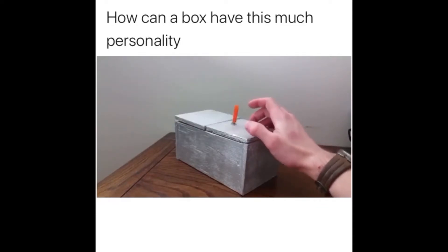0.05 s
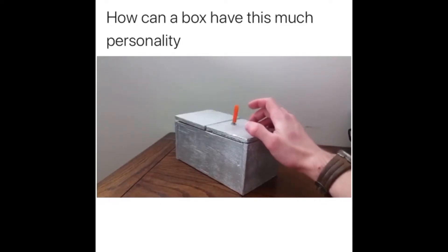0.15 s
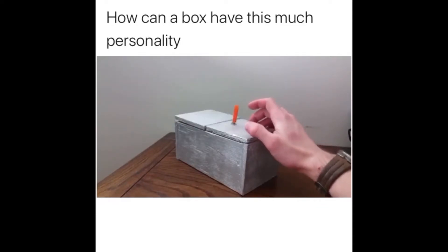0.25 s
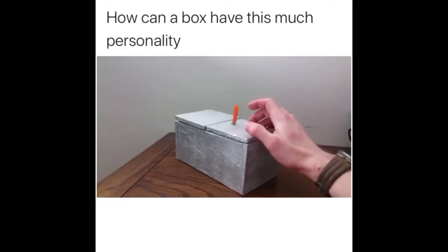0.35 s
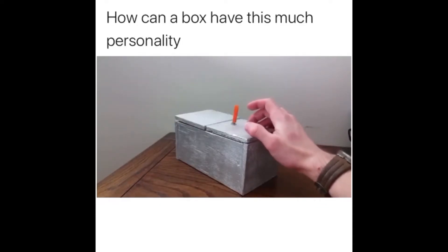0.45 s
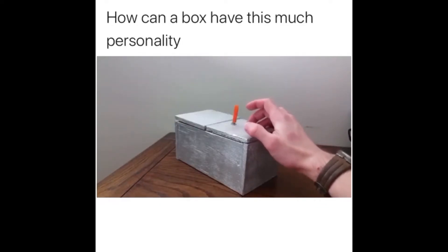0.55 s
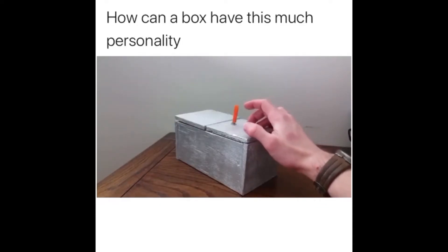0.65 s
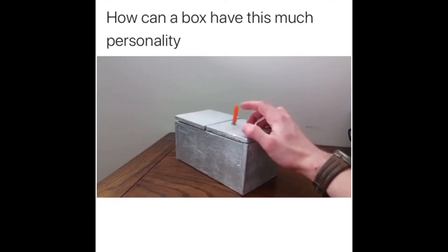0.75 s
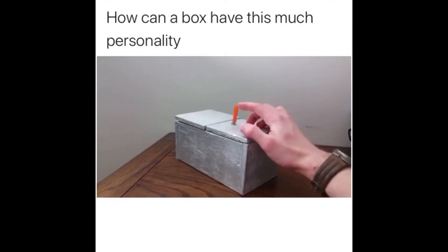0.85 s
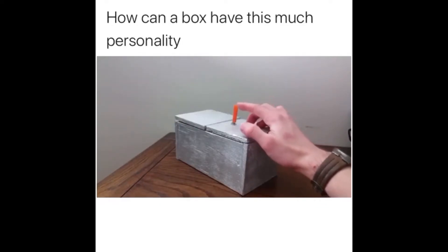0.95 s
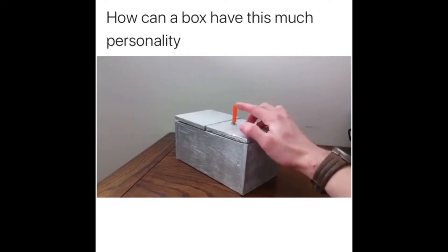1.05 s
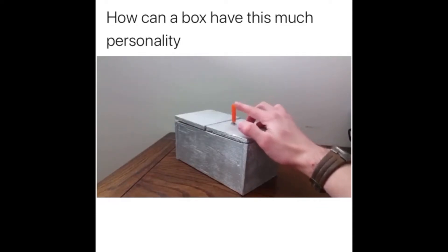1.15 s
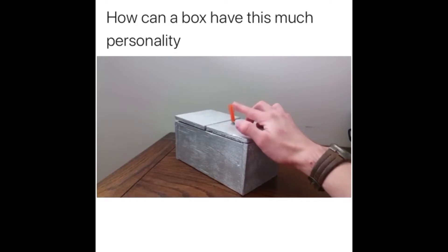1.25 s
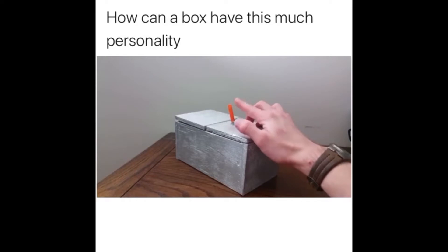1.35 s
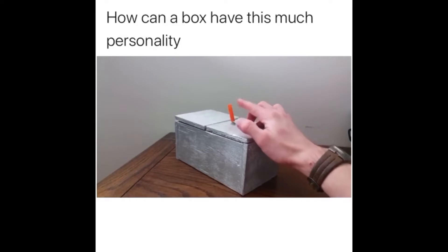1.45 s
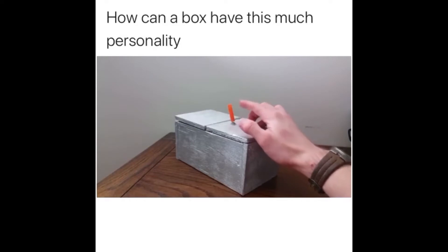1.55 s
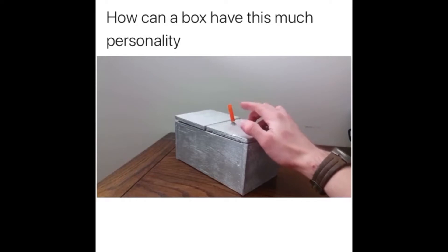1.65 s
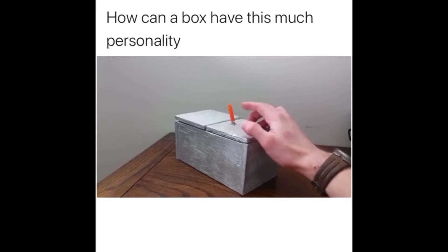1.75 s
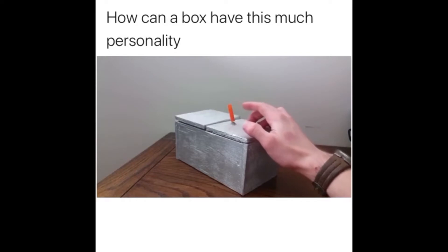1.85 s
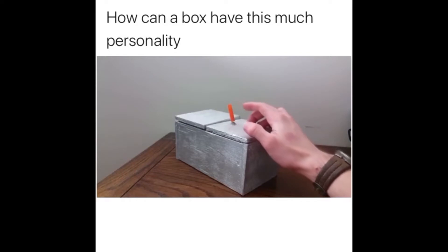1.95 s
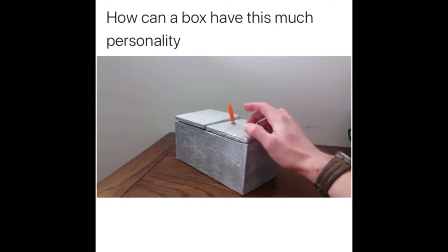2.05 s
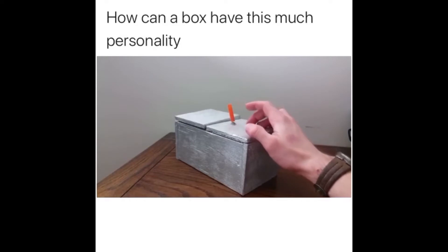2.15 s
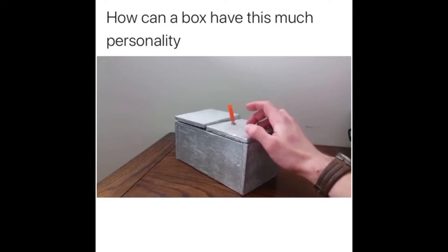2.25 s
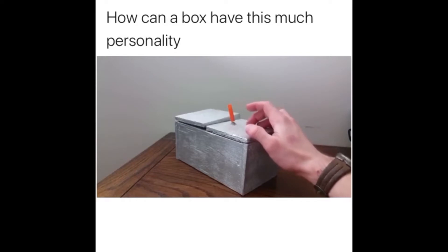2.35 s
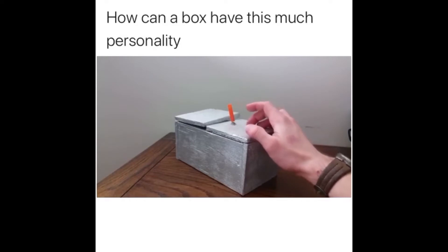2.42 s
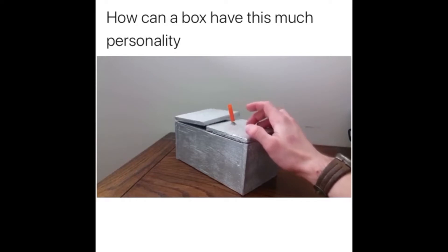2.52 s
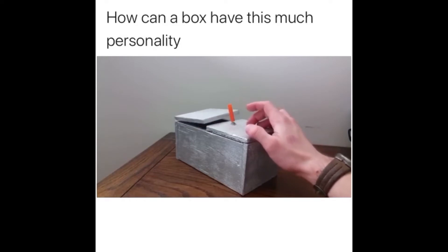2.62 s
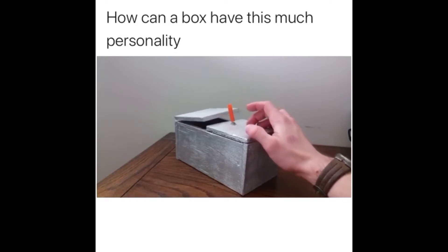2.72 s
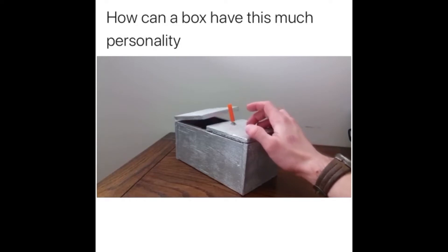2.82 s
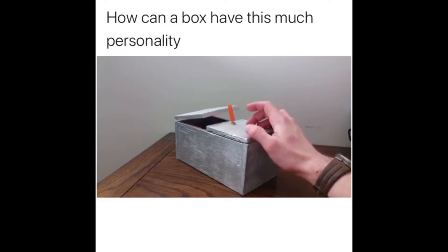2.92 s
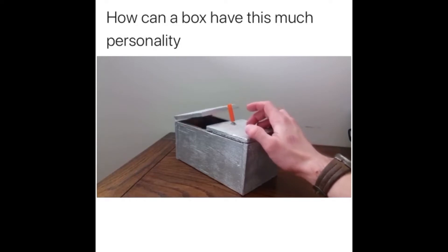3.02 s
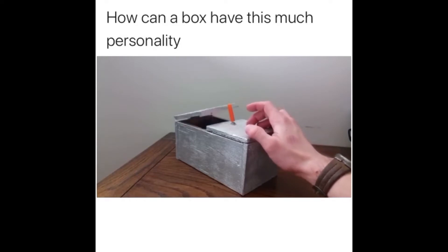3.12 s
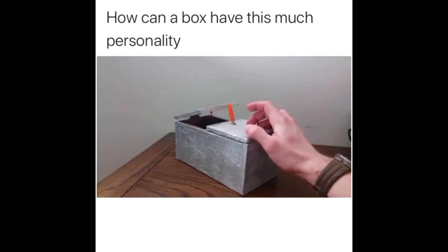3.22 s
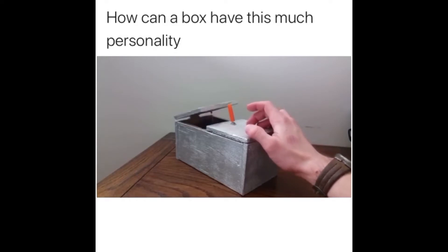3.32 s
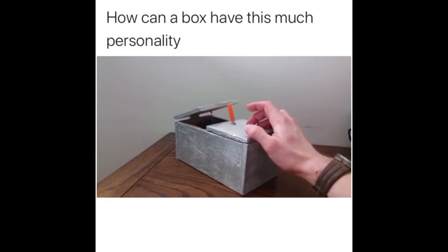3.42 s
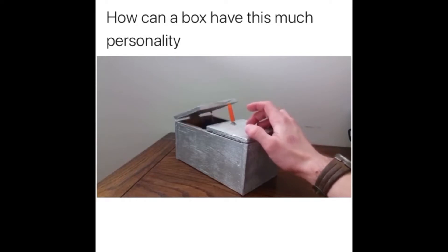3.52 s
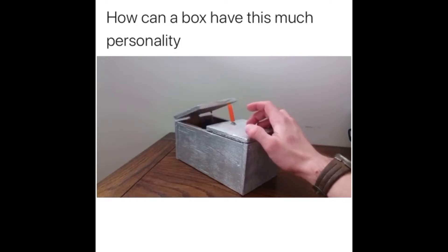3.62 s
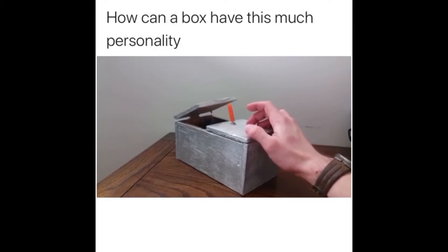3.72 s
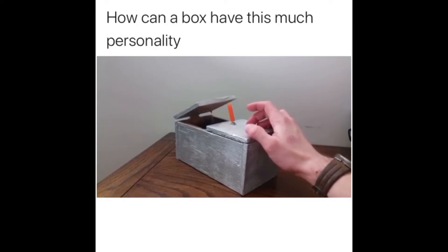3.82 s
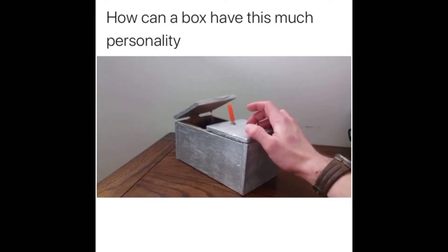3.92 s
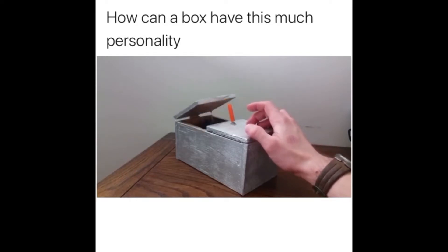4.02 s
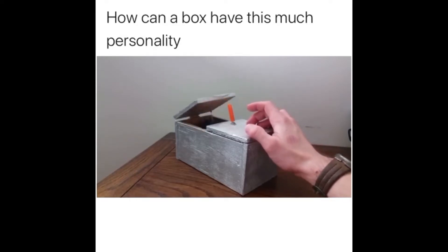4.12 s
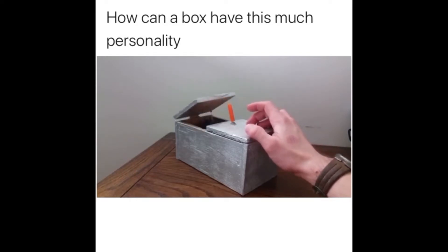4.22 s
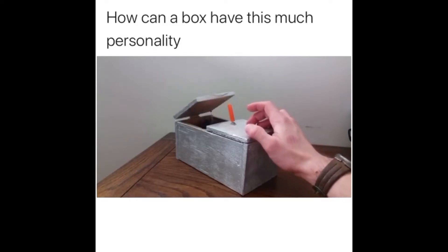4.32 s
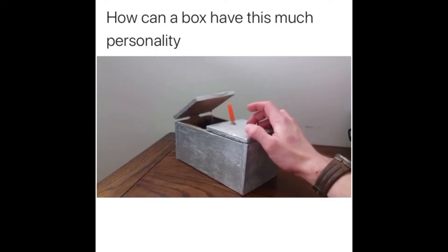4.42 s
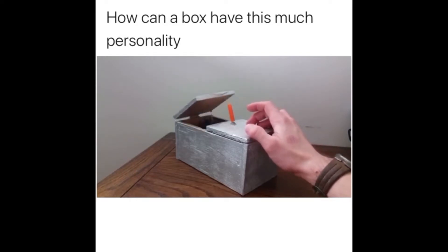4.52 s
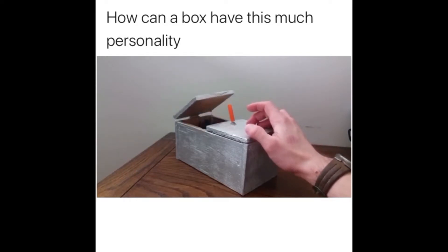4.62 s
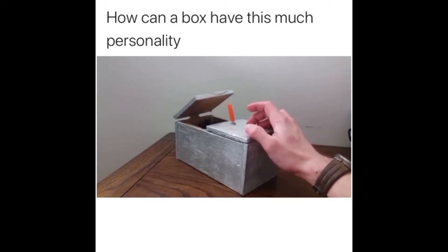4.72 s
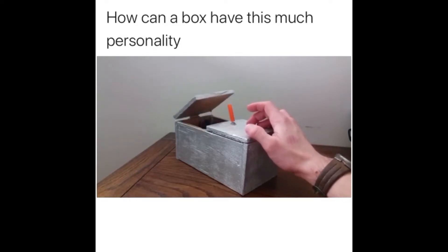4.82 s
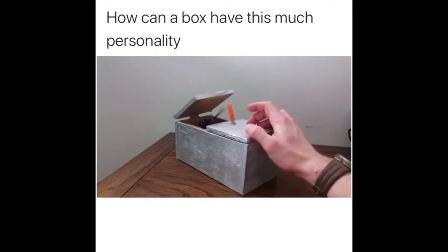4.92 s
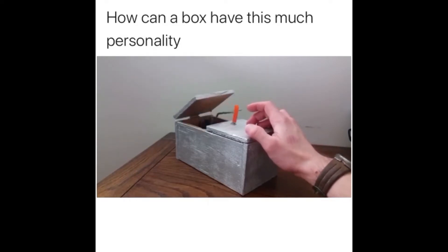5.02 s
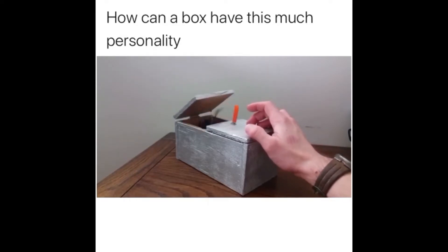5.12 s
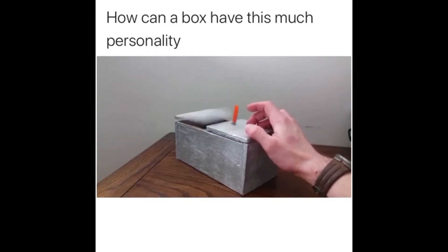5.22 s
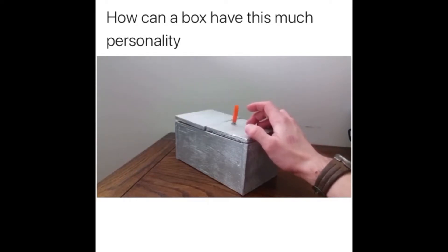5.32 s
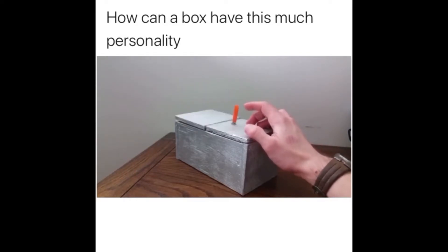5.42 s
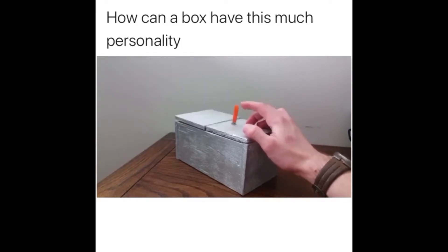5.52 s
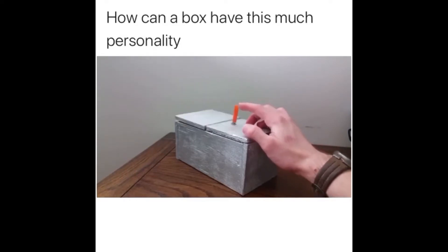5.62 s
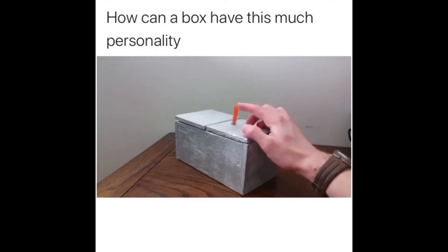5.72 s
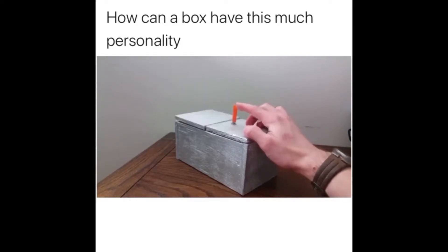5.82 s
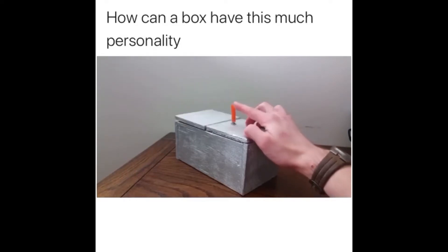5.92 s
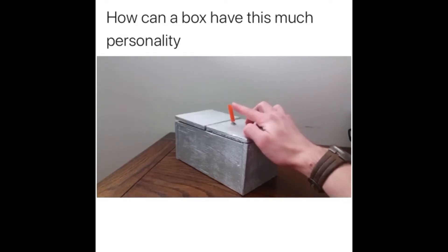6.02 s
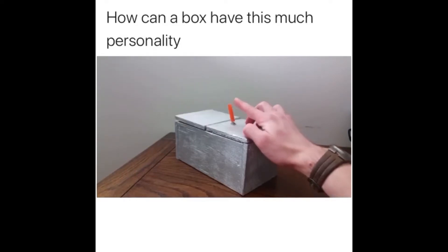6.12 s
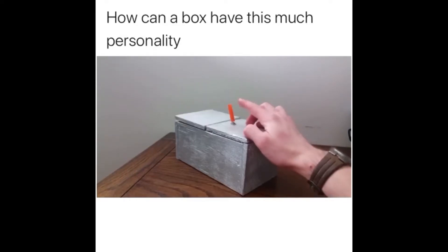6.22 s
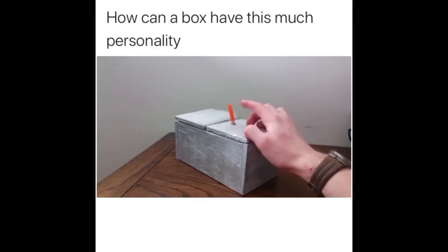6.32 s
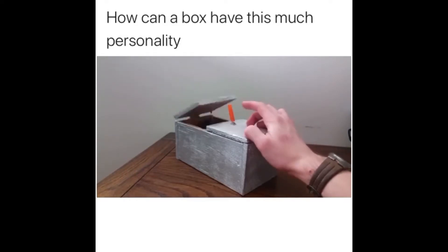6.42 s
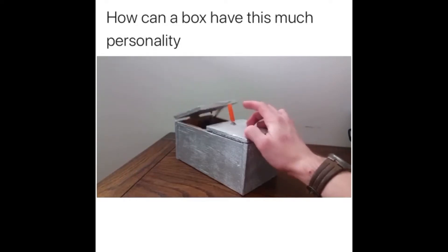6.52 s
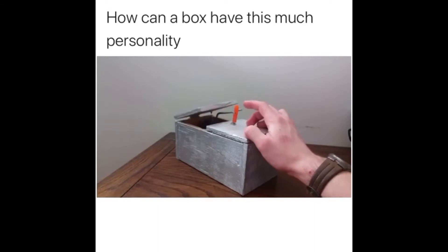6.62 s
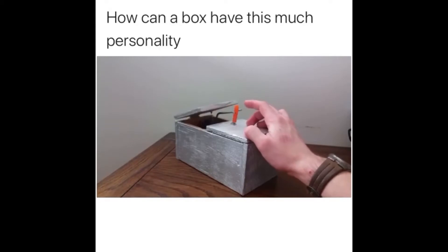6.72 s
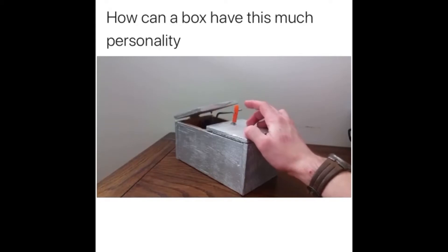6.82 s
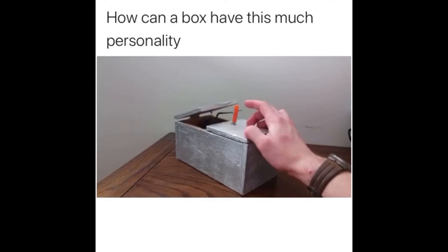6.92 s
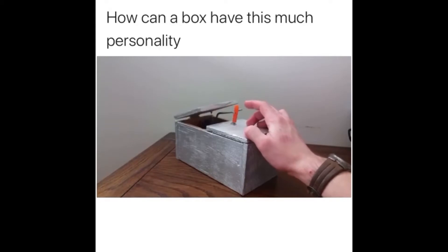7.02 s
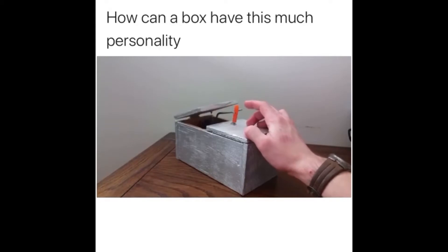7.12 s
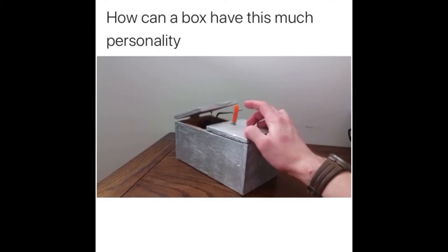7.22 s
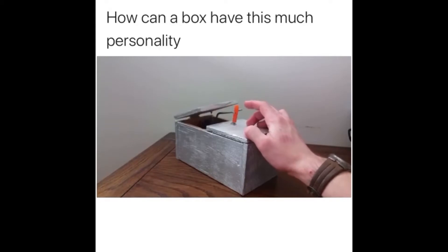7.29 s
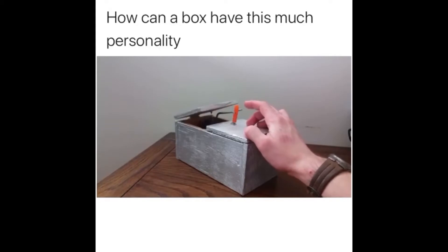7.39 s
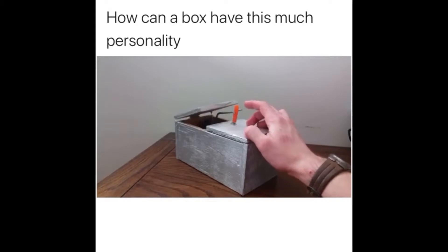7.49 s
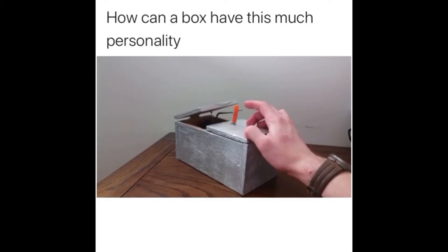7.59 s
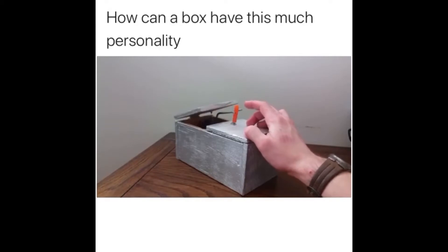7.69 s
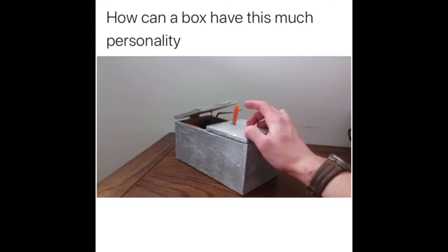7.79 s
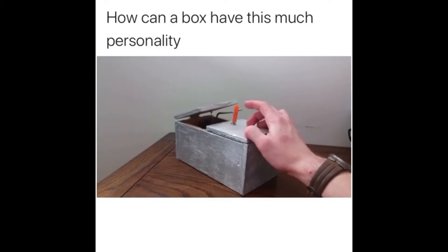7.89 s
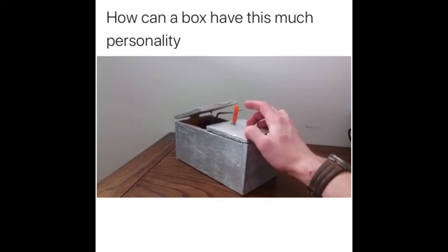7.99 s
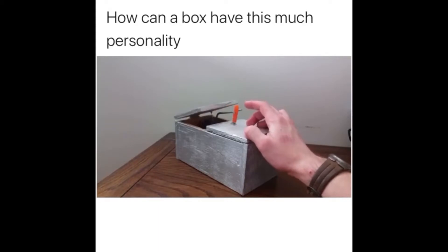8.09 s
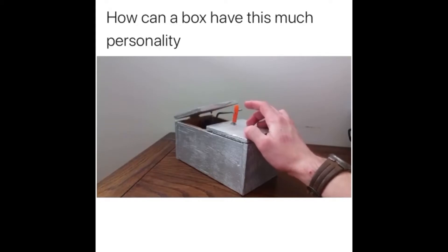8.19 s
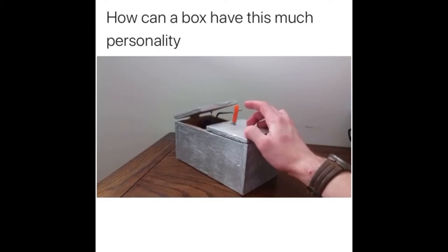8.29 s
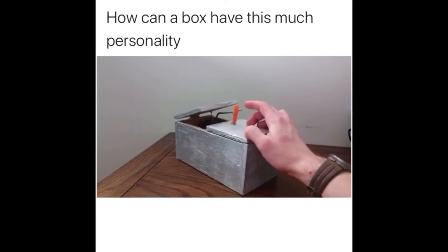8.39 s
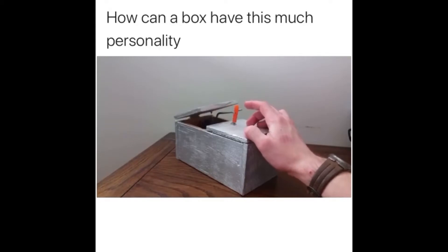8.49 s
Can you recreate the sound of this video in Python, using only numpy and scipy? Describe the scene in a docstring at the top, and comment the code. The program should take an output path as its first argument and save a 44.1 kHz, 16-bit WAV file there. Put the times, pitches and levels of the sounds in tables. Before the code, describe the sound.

A servo whirr and a hollow wooden lid slap, then a toggle click, a long twitchy servo creep, sudden whirring, loud knocks, and another quicker round.

```python
"""Toggle box in a quiet room

A small wooden box near one microphone: a finger clicks its toggle; servo motors lift the lid and flick it back.
Creeping or holding, a servo twitches on its 50-a-second control pulse, as shaped noise; at full speed
its gears whirr as denser noise, with short tones. Toggle, arm and lid knock on the hollow box as decaying
modes, and a short room tail and faint room hiss and hum lie behind."""
import sys
import numpy as np
from scipy import signal
from scipy.fft import rfft, irfft, next_fast_len
from scipy.io import wavfile
from scipy.ndimage import uniform_filter1d

SR = 44100
rng = np.random.default_rng(int(sys.argv[2]) if len(sys.argv) > 2 else 0)


def generate_wav(sig):
    """Save sig (samples, or channels by samples) to the path in sys.argv[1] as 16-bit PCM at SR."""
    pcm = np.round(np.clip(np.atleast_2d(sig).T, -1, 1) * 32767).astype(np.int16)
    wavfile.write(sys.argv[1], SR, pcm)


N = 377055
T = np.arange(N) / SR

# The lid creeps up. Each row: time in seconds, twitch level, box hum level in dB,
# treble above the 6860 Hz split in dB relative to the twitch.
CREEP = [(1.35, -57.5, -67, -8), (1.49, -45.5, -58, -0.5), (1.6, -52, -80, -9), (1.66, -60.5, -89, -24),
         (1.7, -49, -78, 1), (1.82, -52.5, -69, -16), (2.04, -49, -72.5, -10.5), (2.2, -43.5, -58.5, -3),
         (2.3, -44.5, -57.5, -9.5), (2.47, -41, -59.5, -5.5), (2.57, -43.5, -58.5, -9),
         (2.79, -42, -60.5, -4.5), (3.3, -43, -58, -6.5), (3.9, -43, -58.5, -10.5), (4.0, -46, -76, -6),
         (4.06, -43.5, -60.5, -9), (4.5, -43.5, -64, -6), (4.62, -42.5, -59.5, -6.5),
         (4.86, -42.5, -58.5, -11)]
# Single twitches that stand out, some strong, some faint and bright.
# Each row: start in seconds, level in dB, treble in dB relative to it.
JERKS = [(1.7482, -57, 6), (1.788, -52, -5), (1.8484, -46.5, -5), (1.889, -55, -6), (1.9472, -52, -24),
         (2.068, -44, -17), (2.09, -38, -1), (2.19, -57, 2), (2.228, -57, 8), (2.449, -40.5, 5),
         (2.549, -58, 13), (2.6483, -47, 6), (2.69, -43, 4.5), (2.7073, -42, 0), (2.748, -46.5, 2),
         (2.7893, -50, 8), (2.8074, -45, -4), (2.888, -44, -3), (2.946, -44.5, 4), (2.9832, -37, -2.5),
         (3.0097, -42, -1), (3.048, -42, -10), (3.086, -46, -2), (3.205, -37.5, -2), (3.2473, -42, 7),
         (3.2844, -37, 0), (3.3066, -45, 5), (3.449, -41, -16), (3.547, -40, 3.5), (3.607, -49, -7),
         (3.6264, -43, -4), (3.749, -41, -12), (3.7645, -40.5, -2), (3.786, -50, -15), (3.806, -36, -1),
         (3.8473, -36, 4), (3.949, -48, 2), (4.044, -41.5, 0), (4.106, -48.5, 7), (4.1454, -43.5, 7),
         (4.165, -46, 6), (4.3068, -45, 0), (4.343, -40, -1), (4.364, -39, -3), (4.465, -57, 11),
         (4.5448, -42, 4), (4.6254, -47, 3), (4.647, -37.5, 2)]
# Colour of the twitch noise. Each row: frequency in Hz, relative density in dB.
TWITCH = [(200, -5.5), (400, -6.5), (1000, -14.5), (2300, -16), (3000, -12.5), (3600, -9), (4800, -3.5),
          (6500, -12), (7400, -4.5), (8900, -10), (9300, -13.5), (10400, -27), (11500, -16.5), (12600, -12)]
# Humps that the case adds to it. Each row: centre in Hz, width in Hz, gain in dB.
CASE = [(2085, 72, 8), (2984, 330, 8), (4824, 210, 7), (6010, 530, 10), (7360, 1100, 5), (8610, 380, 10.5)]
# Lowest box resonances, passed twice. Each row: centre in Hz, width in Hz, gain per pass in dB.
HUM = [(65.7, 36, 0), (110.4, 32, 0.5), (145.2, 17, -0.5)]
# The servo settles under the open lid. Each row: time in seconds, twitch level in dB, strained lid level in dB.
HOLD = [(6.75, -55, -82), (6.94, -50, -86), (7.3, -53, -80), (7.47, -57, -77), (8.55, -58.5, -76)]
# Colour of the holding servo. Each row: frequency in Hz, relative density in dB.
BUZZ = [(180, 1), (300, -1), (773, -4.5), (891, -5.5), (1030, -5), (1160, -5.5), (1320, -10), (2220, -13.5),
        (3100, -4), (5820, 6), (6600, -12), (7730, -2), (8900, -13), (9480, -34.5), (13000, -24)]
# The lid under load, passed twice. Each row: centre in Hz, width in Hz, gain per pass in dB.
STRAIN = [(425, 130, -3), (596, 110, 0.5), (897, 81, -0.5), (1020, 50, -7), (1156, 66, 4)]
# One list a fast stroke. Each row: time in seconds, gear level in dB, shaken box level in dB.
STROKES = [
    [(0.0, -27, -32.5), (0.018, -18.5, -40), (0.066, -26.5, -25), (0.13, -31.5, -38), (0.2, -38, -51)],
    [(4.84, -38, -64), (4.858, -28, -49.5), (4.87, -31, -46), (5.026, -31, -44.5), (5.048, -18.5, -33),
     (5.064, -25, -44.5), (5.08, -19, -34), (5.092, -30.5, -41), (5.3, -25, -36.5), (5.312, -21.5, -31),
     (5.335, -23, -20.5), (5.376, -21.5, -31), (5.45, -58, -47)],
    [(6.35, -59, -60), (6.402, -23, -48), (6.44, -24, -50), (6.532, -36, -43.5), (6.578, -25, -40),
     (6.616, -33.5, -39), (6.66, -23.5, -42.5), (6.672, -19, -44), (6.69, -19, -35), (6.702, -22.5, -26),
     (6.712, -53, -27), (6.8, -63, -61)],
]
# Colour of the gears. Each row: frequency in Hz, relative density in dB.
GEARS = [(900, -22.5), (1500, -31.5), (2000, -29), (2600, -16), (3200, -6), (4100, -11), (5500, -5.5),
         (6500, -4), (7500, -0.5), (8700, -5), (9300, -10), (10400, -12.5), (11500, -5), (12500, -2.5)]
# Short tones during the fast strokes.
# Each row: start in seconds, length in seconds, mean pitch in Hz, start level and end level in dB.
TONES = [(4.899, 0.15, 441, -39, -34), (5.2, 0.1, 462, -44.5, -37.5), (6.391, 0.094, 127, -32, -46),
         (6.424, 0.069, 2005, -42, -58), (6.511, .15, 428, -45.5, -35.5)]
# The arm slips on the toggle. Each row: start in seconds, length in seconds, start and end pitch in Hz, level in dB.
SQUEAKS = [(5.042, .018, 4300, 2900, -21), (6.665, .014, 4500, 3200, -19)]
# Levels of a squeak's harmonics from the fundamental up, in dB.
OVERTONES_DB = [-6.5, -1.5, -7.5]
# The toggle snaps over. Each row: start in seconds, level in dB.
CLICKS = [(1.3400, -25.5), (6.0981, -24.5)]
# Ringing parts of the toggle. Each row: frequency in Hz, level in dB, 60 dB decay time in seconds.
TOGGLE = [(3104, -9, 0.037), (3315, -5.5, 0.026), (4340, 1.5, .02), (4570, -1, 0.017), (5200, -16.5, 0.017),
          (11360, -3, .01)]
# Blows on the box. Each row: start in seconds, blow level in dB, crack level in dB relative to the blow,
# extra level of the low modes and of the high modes in dB.
KNOCKS = [(0.0591, 1.5, -6, -1.5, 1.5), (0.067, -20.5, -11, -4.5, -24), (.087, -15, -31.5, -1, 1.5),
          (0.103, -15, -19.5, -13.5, -17.5), (1.34, -14.5, -9, 1.5, 1.5), (1.368, -24, -31.5, -1, -7),
          (5.032, -19.5, -18.5, 1, 12.5), (5.0772, -5, -8, -1, 11.5), (5.3264, 1, -6, -1, -1),
          (5.341, -13.5, -27, -6.5, -5.5), (5.356, -2.5, -15.5, -6.5, -13.5), (5.37, -2.5, -19, -15.5, -3),
          (6.1002, -14.5, -9, -1, -3.5), (6.127, -22, -31, 5, -4.5), (6.572, -15.5, -5.5, 3.5, 11.5),
          (6.657, -27, -23, 18, 17), (6.6998, -9.5, -4.5, 5, 10.5), (6.73, -11, -26, -15, -25)]
# Modes of the hollow box. Each row: frequency in Hz, relative level in dB, 60 dB decay time in seconds.
BOX = [(68.6, -11, 0.067), (124, -6.5, 0.063), (159, -0.5, 0.04), (231, -2, 0.044), (313.6, -5, 0.11),
       (319.4, -6, 0.13), (369, -3.5, 0.044), (453, 0.5, 0.03), (503, 0.5, 0.033), (549, -4, 0.046),
       (640, -13, 0.1), (793, -9.5, 0.027), (932.5, -10, 0.037), (1152, -13.5, 0.0097), (1416, -18, 0.02),
       (2095, -22.5, 0.015)]
# Colour of the crack. Each row: frequency in Hz, relative density in dB.
CRACK = [(900, -0.5), (2200, -12.5), (3100, -4.5), (4400, -3.5), (6000, -9), (7500, -18), (10200, -22.5),
         (12500, -14)]
# Room decay. Each row: frequency in Hz, 60 dB decay time in seconds.
ROOM = [(100, 0.5), (400, 0.35), (1500, 0.5), (5000, 0.5), (12000, 0.31)]
# Colour of the room air. Each row: frequency in Hz, relative density in dB.
AIR = [(25, -30.5), (60, -8), (90, -13), (125, -2.5), (160, -25.5), (250, -26), (600, -34), (1300, -40.5),
       (2200, -49), (3100, -28), (3500, -37), (4450, -17.5), (5600, -41), (6200, -59)]
# Hum in the room. Each row: frequency in Hz, level in dB before it wavers.
MAINS = [(70, -71), (118.4, -69), (236.9, -76)]

CREEP_HZ, CREEP_S, HOLD_HZ, HOLD_S = 50.094, 1.3514, 50.065, 6.763  # control pulse rates and first pulses
PULSES = 176  # pulses in each train, enough to cover the creep and the hold
JERK_RISE_S, JERK_S, JERK_FALL_S = 0.0029, 0.0025, 0.0055  # the motor kicks in, runs and coasts
TREBLE_GROWTH, SPREAD_DB = 1.8, 2.6  # twitches differ in size, and stronger ones are brighter
WAVER_DB = 2.5  # the box hum wavers
TONE_EDGE_S = .015
AIR_DB = -56.5  # rms
GAP_S = (1.3245, 1.336)  # silence
EDGE_HZ = 13100


def gain_of(db):
    """Amplitude factor of a level in dB."""
    return 10 ** (np.asarray(db) / 20)


def evened(x):
    """The sound scaled to rms 1."""
    return x / np.sqrt(np.mean(x ** 2) + 1e-20)


def wander(samples):
    """Random drift of rms 1, smoothed over a number of samples."""
    return evened(uniform_filter1d(rng.standard_normal(N), samples))


def read(points, hz):
    """Table values read between the rows along log frequency."""
    f, value = np.transpose(points)
    return np.interp(np.log(hz + 1), np.log(f + 1), value)


def curves(rows):
    """Columns over the whole time, and a gate that is open while the rows last."""
    s, *columns = np.transpose(rows)
    inside = 1. * (T >= s[0]) * (T <= s[-1])
    gate = uniform_filter1d(inside, size=300, mode="nearest")
    return gate, *(np.interp(T, s, c) for c in columns)


def add(mix, s, sound):
    """Lay a sound into the mix at s seconds."""
    part = mix[round(s * SR):][:len(sound)]
    part += sound[:len(part)]


def noise(points, peaks=(), count=N):
    """Noise of rms 1 with a spectrum and extra humps."""
    size = next_fast_len(count)
    hz = np.fft.rfftfreq(size, 1 / SR)
    db = read(points, hz) + sum(d / (1 + (2 * (hz - f) / w) ** 2) for f, w, d in peaks)
    db -= 40 * (hz < .7 * points[0][0])  # little below the first row
    spectrum = rfft(rng.standard_normal(size)) * gain_of(db)
    return evened(irfft(spectrum, size)[:count])


def patchy(x, patchy_db):
    """Colour that shifts in random patches, a few hundred Hz by a few tens of ms."""
    z = signal.stft(x, nperseg=256)[2]
    field = uniform_filter1d(rng.standard_normal(z.shape), size=4, axis=0)
    field = uniform_filter1d(field, size=6, axis=1)
    return evened(signal.istft(z * gain_of(patchy_db * evened(field)), nperseg=256)[1][:N])


def resonate(x, modes):
    """Sum of resonances, each with its peak gain in dB."""
    return sum(gain_of(db) * signal.lfilter(*signal.iirpeak(hz, hz / width, SR), x)
               for hz, width, db in modes)


def split(x, hz):
    """Parts below and above hz, which sum to the whole."""
    low = signal.sosfiltfilt(signal.butter(4, hz, fs=SR, output="sos"), x)
    return low, x - low


def pulses(start_s, hz, spread_db):
    """One click for each control pulse, of random size."""
    train = np.zeros(N)
    at = np.round((start_s + np.arange(PULSES) / hz) * SR).astype(int)
    size = gain_of(spread_db * rng.standard_normal(len(at)))
    train[at[at < N]] = size[at < N]
    return train


def kick(rise_s, last_s, fall_s):
    """Envelope of a motor that kicks in, runs up to a few ms longer and coasts."""
    t = T[:2000]
    return (1 - np.exp(-t / rise_s)) * np.exp(-np.maximum(t - last_s, 0) / fall_s)


def twitch_shape(train, rise_s, last_s, fall_s):
    """A kick at every pulse."""
    return signal.oaconvolve(train, kick(rise_s, last_s, fall_s))[:N]


def jerks(low, high):
    """Twitches that stand out: single kicks that open the middle and the treble of the servo noise."""
    mid = split(low, 2600)[1]
    dull, bright = np.zeros(N), np.zeros(N)
    shape = kick(JERK_RISE_S, JERK_S, JERK_FALL_S)
    for s, db, treble_db in JERKS:
        add(dull, s, gain_of(db) * shape)
        add(bright, s, gain_of(db + treble_db) * shape)
    return dull * evened(mid) + bright * evened(high)


def box_hum(train):
    """The twitches and an equal share of noise stir the lowest box resonances, and the hum wavers."""
    sources = (train - train.mean(), rng.standard_normal(N))
    hum = sum(evened(resonate(resonate(v, HUM), HUM)) for v in sources)
    waver = evened(uniform_filter1d(wander(2000), size=2000))
    return gain_of(WAVER_DB * waver) * hum


def creep():
    """Servo twitches on the pulse grid, single ones that stand out, and the hum they stir in the box."""
    gate, twitch_db, hum_db, top_db = curves(CREEP)
    low, high = split(patchy(noise(TWITCH, CASE), 2.87), 6860)
    teeth = gain_of(1.8 * wander(40))  # uneven tooth contacts
    train = pulses(CREEP_S, CREEP_HZ, SPREAD_DB)
    # a steady floor under the twitches
    dull, bright = (0.44 + teeth * twitch_shape(v, 0.0034, 0.0023, 0.0036)
                    for v in (train, train ** TREBLE_GROWTH))
    twitches = gate * gain_of(twitch_db) * (dull * low + gain_of(top_db) * bright * high)
    return twitches + teeth * jerks(low, high) + gate * gain_of(hum_db) * box_hum(train)


def hold():
    """Even, faint twitches, and the loaded lid rung by pulses, near multiples of the pulse rate."""
    gate, twitch_db, strain_db = curves(HOLD)
    shape = twitch_shape(pulses(HOLD_S, HOLD_HZ, 1.64), 0.00061, 0.012, 0.0034)
    buzz = (0.27 + shape) * noise(BUZZ)
    strain = resonate(resonate(pulses(HOLD_S, HOLD_HZ, 0.72), STRAIN), STRAIN)
    return gate * gain_of(twitch_db) * buzz, gate * gain_of(strain_db) * evened(strain)


def gear_chatter():
    """Dense, uneven gear noise, and the box modes shaken by it, drawn as separate noise."""
    gears = gain_of(1.5 * wander(90)) * patchy(noise(GEARS), 4.)
    modes = [(hz, 30, db) for hz, db, t60 in BOX]  # all 30 Hz wide
    shaken = evened(resonate(rng.standard_normal(N), modes))
    out = np.zeros(N)
    for rows in STROKES:
        gate, db, box_db = curves(rows)
        out += gate * (gain_of(db) * gears + gain_of(box_db) * shaken)
    return out


def short_tones(wobble):
    """Short sine tones of slightly unsteady pitch during the fast strokes."""
    out = np.zeros(N)
    for s, length, hz, start_db, end_db in TONES:
        t = np.arange(0, length, 1 / SR)
        edges = np.minimum(np.minimum(t, length - t) / TONE_EDGE_S, 1) ** 2
        pitch = hz * (1 + .02 * wobble[round(s * SR):][:len(t)])
        tone = np.sin(2 * np.pi * np.cumsum(pitch) / SR)
        add(out, s, edges * gain_of(start_db + (end_db - start_db) * t / length) * tone)
    return out


def squeaks(wobble):
    """The arm slips on the toggle: short harmonic tones that fall in pitch."""
    out = np.zeros(N)
    for s, length, start_hz, end_hz, db in SQUEAKS:
        u = np.arange(0, 1, 1 / (length * SR))  # share of the squeak gone by
        slip = 1 + 0.012 * wobble[:len(u) * 9:9]
        turns = np.cumsum((start_hz + (end_hz - start_hz) * u ** 2.4) * slip) / SR
        tone = sum(gain_of(d) * np.sin(2 * np.pi * (k + 1) * turns) for k, d in enumerate(OVERTONES_DB))
        add(out, s, gain_of(db) * tone * np.sin(np.pi * u ** 1.1))
    return out


def strokes():
    """Servos at full speed: gear chatter, short tones and squeaks of the arm."""
    wobble = wander(250)
    return gear_chatter() + short_tones(wobble) + squeaks(wobble)


def knocks():
    """Each blow rings the box modes in its own balance, with a short crack of noise."""
    out, t = np.zeros(N), T[:9000]
    hz, mode_db, t60 = np.transpose(BOX)[:, :, None]
    chance = rng.standard_normal((len(KNOCKS), len(BOX), 1))
    sign = (-1.) ** np.arange(len(BOX))[:, None]
    # the crack dies fast, then leaves a weaker, slower tail
    crack_shape = (1 - np.exp(-t / 0.00063)) * (gain_of(-60 * t / .01) + 0.13 * gain_of(-60 * t / 0.099))
    for (s, db, crack_db, low_db, high_db), c in zip(KNOCKS, chance):
        balance_db = np.interp(hz, [200, 330, 600, 900], [low_db, 0, 0, high_db])
        level = gain_of(mode_db + balance_db + 1.5 * c - 60 * t / t60)
        ring = (sign * level * np.sin(2 * np.pi * hz * t)).sum(0) * (1 - np.exp(-t / 0.0015))
        crack = noise(CRACK, count=len(t)) * gain_of(crack_db) * crack_shape
        add(out, s, gain_of(db) * (0.33 * ring + crack))
    # a small box radiates no deep bass
    return signal.sosfilt(signal.butter(2, 85, "high", fs=SR, output="sos"), out)


def toggle():
    """The spring snaps the contact over and its small parts ring."""
    out, t = np.zeros(N), T[:4000]
    ring = sum(gain_of(db - 60 * t / t60) * np.sin(2 * np.pi * hz * t) for hz, db, t60 in TOGGLE)
    for s, db in CLICKS:
        add(out, s, gain_of(db) * ring * (1 - np.exp(-t / 0.0013)))
    return out


def room(x):
    """Sparse reflections of random sign, each band dying at its own speed."""
    taps = np.zeros(SR // 2)
    at = np.arange(200, len(taps) - 20, 20)
    taps[at + rng.integers(0, 20, len(at))] = rng.choice([-1., 1.], len(at))
    hz, t, z = signal.stft(taps, SR, nperseg=256)
    fade = (1 - np.exp(-t / 0.005)) * gain_of(-60 * t / read(ROOM, hz)[:, None])
    tail = signal.istft(z * fade, SR, nperseg=256)[1]
    return signal.fftconvolve(x, tail / np.linalg.norm(tail))[:N]


def air():
    """Room hiss and rumble as shaped noise, with a hum of wavering sines."""
    drift = uniform_filter1d(rng.standard_normal((len(MAINS), N)), 3000)
    waver = gain_of(2.5 * evened(drift))
    hum = sum(w * gain_of(db) * np.sin(2 * np.pi * hz * T) for w, (hz, db) in zip(waver, MAINS))
    return gain_of(AIR_DB) * noise(AIR) + hum


def scene():
    """Direct sound of servos and blows, their room tail, and the air behind."""
    buzz, strain = hold()
    servo = creep() + buzz + strokes()
    blows = knocks() + toggle()
    heavy, thin = split(blows, 1500)
    wet = gain_of(-10.5) * servo + gain_of(-3.0) * heavy + gain_of(-7) * thin
    return (servo + strain + blows + room(wet) + air())[None]


def record(dry):
    """The sound drops out for a moment before the first toggle click; then the treble is cut at the band limit."""
    back_s = .003  # fade back in
    off = (T > GAP_S[0]) * np.clip((GAP_S[1] + back_s - T) / back_s, 0, 1)
    lowpass = signal.firwin(301, EDGE_HZ, window=("kaiser", 7), fs=SR)
    return signal.oaconvolve(dry * (1 - off), lowpass[None], "same")


dry = scene()
out = record(dry)
generate_wav(out)
```